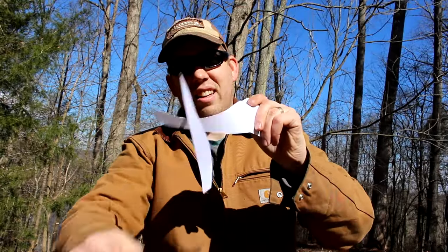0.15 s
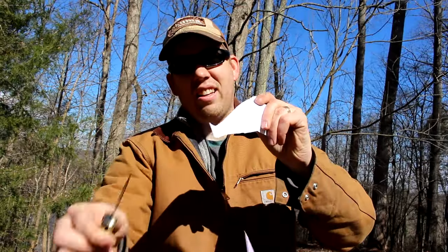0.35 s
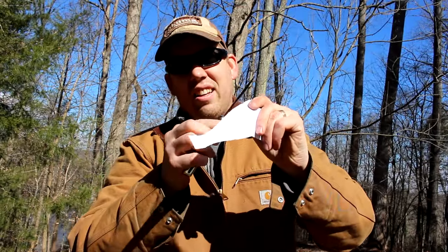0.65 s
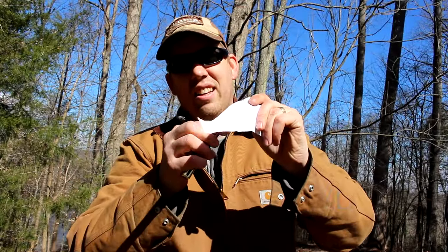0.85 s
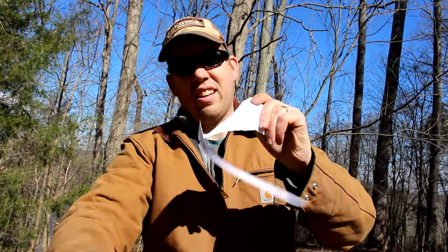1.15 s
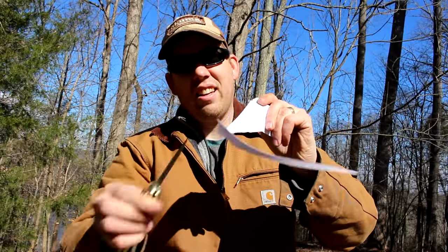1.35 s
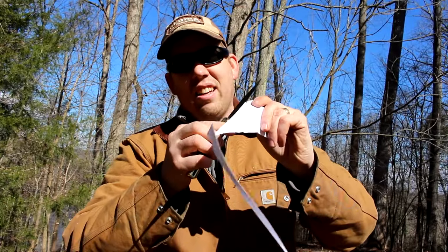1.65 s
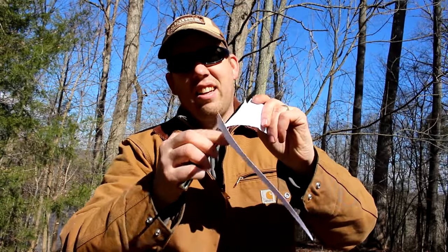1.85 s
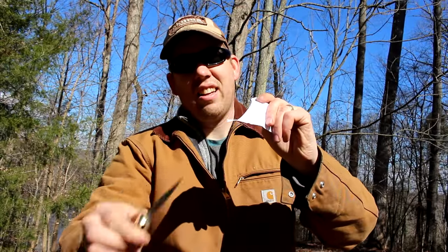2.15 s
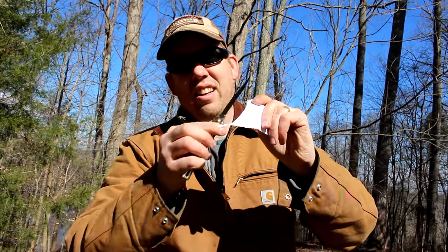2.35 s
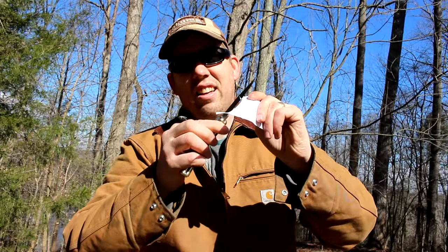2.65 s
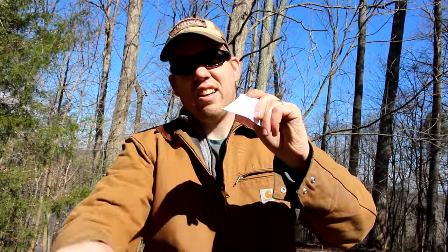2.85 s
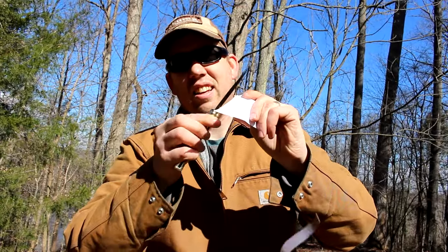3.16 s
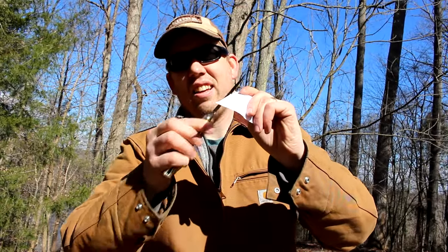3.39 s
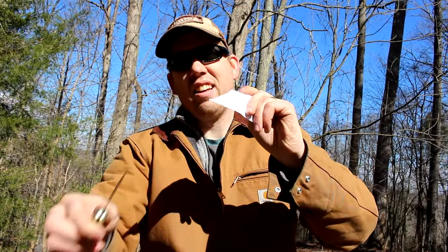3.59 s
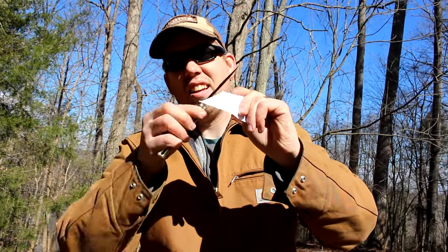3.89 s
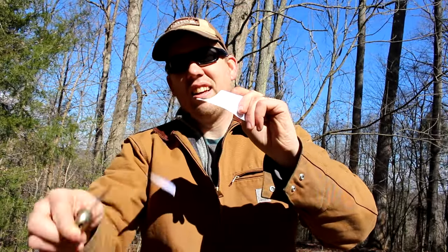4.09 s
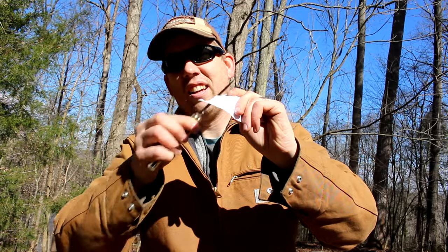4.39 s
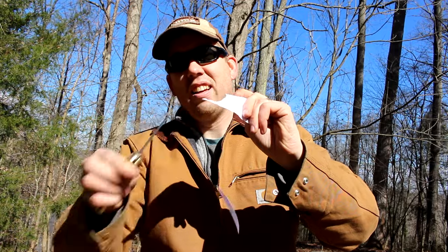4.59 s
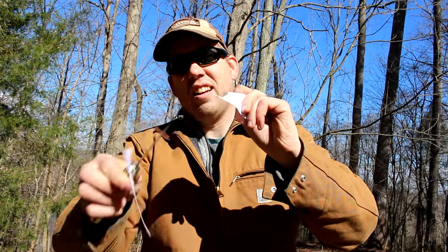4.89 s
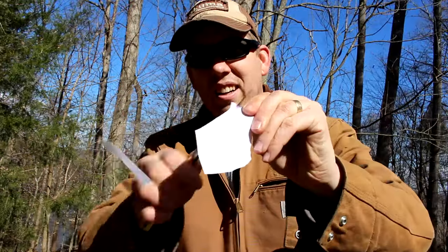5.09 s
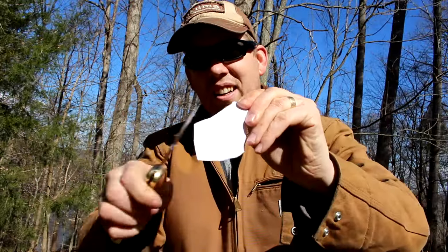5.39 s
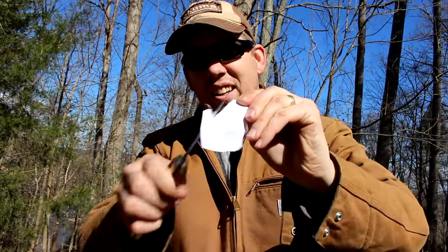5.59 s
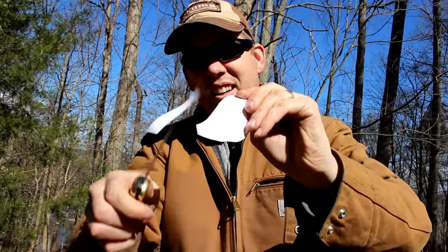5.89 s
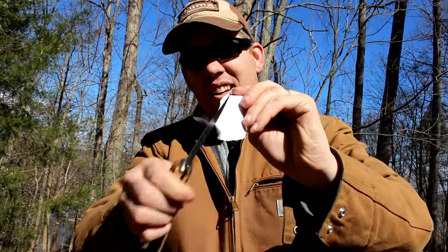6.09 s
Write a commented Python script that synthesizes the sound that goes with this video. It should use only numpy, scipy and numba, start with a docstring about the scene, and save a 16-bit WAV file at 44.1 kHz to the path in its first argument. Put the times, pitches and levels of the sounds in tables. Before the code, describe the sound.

Bright, dry rips of a blade through paper, drawn out at first, then shorter and snappier, close up outdoors with low wind rumble.

```python
"""First a knife slices through a hand-held sheet of paper over a low rumble of wind, in a wood.
More drawn slices follow, then quick chops that start with a snap, among small creases and light grazes.
Each cut is a dense impulse noise of breaking fibres that excites the resonances of the sheet.
Filtered noise gives a far murmur of trees and the wind; wavering sines give a small bird far off.
Automatic gain control lifts these quiet sounds and ducks them after loud cuts."""
import sys
import numpy as np
from scipy import signal
from scipy.fft import rfft, irfft
from scipy.io import wavfile
from scipy.ndimage import uniform_filter1d
from numba import njit

SR = 44100
rng = np.random.default_rng(int(sys.argv[2]) if len(sys.argv) > 2 else 0)


def volts(x):
    """Linear amplitude factor 10**(x/20) for a level x in dB, scalar or array-like."""
    e = np.asarray(x, float) / 20
    return 10 ** e


def pcm_store(signal):
    """Save signal as 16-bit PCM."""
    levels = np.round(np.clip(np.atleast_2d(signal), -1, 1) * 32767)
    wavfile.write(sys.argv[1], SR, levels.astype(np.int16).T)


N = 275184  # samples
T = np.arange(N) / SR
BLADE_T = T[::SR // 5000]  # coarser clock for the blade's motion
LEAVE_S = 0.012  # time for a cut to fall 30 dB once the blade leaves

# drawn slices, which swell in until the blade bites fully: [touch t/s, full bite t/s, exit t/s]
SLICES = [(-.04, .045, .188), (.962, 1.05, 1.164), (1.85, 1.92, 2.009), (2.696, 2.738, 2.822),
          (3.448, 3.466, 3.502), (4.02, 4.038, 4.075), (4.438, 4.472, 4.511), (4.808, 4.828, 4.872)]
# quick chops, which start at once: [bite t/s, exit t/s]
CHOPS = [(5.1577, 5.21), (5.4009, 5.424), (5.6394, 5.68), (5.8896, 5.925), (6.1361, 6.189)]


def unit(x):
    """Normalization: scale to rms 1."""
    return x / np.sqrt(np.mean(x ** 2))


@njit
def svf(x, hz, width):
    """Resonance: state-variable band-pass with a moving centre, gain 1 at the centre."""
    y, band_state, low_state = np.empty(len(x)), 0., 0.
    for i in range(len(x)):
        g, k = np.tan(np.pi * hz[i] / SR), width / hz[i]
        v = (band_state + g * (x[i] - low_state)) / (1 + g * (g + k))
        band_state = 2 * v - band_state
        low_state += 2 * g * v
        y[i] = k * v
    return y


@njit
def follow(x, attack, release):
    """Envelope detection: one-pole smoothing that rises fast and falls slowly."""
    y, level = np.empty(len(x)), abs(x[0])
    for i in range(len(x)):
        rate = attack if abs(x[i]) > level else release
        level += (abs(x[i]) - level) * rate
        y[i] = level
    return y


def band(x, hz, width_hz):
    """Fixed resonance: band-pass with a constant centre."""
    return svf(x, np.full(len(x), float(hz)), float(width_hz))


def steep(x, hz, width_hz):
    """Cascaded resonance: band-pass twice, for dark valleys on both sides."""
    return band(band(x, hz, width_hz), hz, width_hz)


def walk(rate):
    """Random modulation: levels held 1 / rate s and slewed twice; spread near 1."""
    k = int(SR / rate)
    held = np.repeat(rng.standard_normal(N // k + 1), k)
    return 1.4 * uniform_filter1d(uniform_filter1d(held, k), k)[:N]


def wood():
    """Spectral shaping: filtered noise makes the smooth far murmur of wind in the trees."""
    # spectrum of the murmur, its shape only: [f/Hz, density level/dB]
    spectrum = [(15, 6.5), (25, -70), (87, 3.5), (354, 0.5), (427, -2.5), (591, -5), (1130, -12),
                (1560, -15.5), (1740, -18), (2050, -15.5), (2220, -18.5), (3340, -16.5), (5280, -31.5),
                (14800, -48.5), (16000, -48)]
    f = np.fft.rfftfreq(N, 1 / SR) + 1  # 1 Hz up, so that the logarithm exists
    hz, db = np.transpose(spectrum)
    shape = volts(np.interp(np.log(f), np.log(hz), db))
    noise = irfft(rfft(rng.standard_normal(N)) * shape, N)
    return volts(-39.5 + .7 * walk(2.4)) * unit(noise)


def wind():
    """Turbulence: low-band noise with a wandering level, air buffeting the microphone port."""
    # strength of the wind, dying down: [t/s, level/dB]
    gust = [(0, -27), (.066, -29), (.11, -47), (.22, -40), (.3, -29), (.38, -34), (.45, -38.5),
            (.69, -33.5), (.83, -27.5), (1.0, -36), (1.06, -35), (1.15, -55), (1.3, -44), (1.9, -47),
            (2.3, -50.5), (3.5, -50), (4.5, -53.5), (6.24, -67)]
    s, db = np.transpose(gust)
    rumble = band(band(band(rng.standard_normal(N), 48, 116), 79, 155), 106, 185)
    return volts(np.interp(T, s, db) + 1.4 * walk(13.0)) * unit(rumble)


def bird():
    """Frequency modulation: two thin, slightly wavering sine notes."""
    # pitch glides of a small bird far off: [t/s, f/Hz, rms level/dB]
    whistle = [(2.345, 8100, -83), (2.375, 7791, -72), (2.389, 7816, -67), (2.449, 7815, -72),
               (2.5, 7849, -67)]
    chip = [(3.098, 4870, -60), (3.108, 5600, -45)]
    out = np.zeros(N)
    for note in (whistle, chip):
        s, hz, db = np.transpose(note)
        fade = np.clip(np.minimum(T - s[0], s[-1] - T) / 0.0044, 0, 1)
        pitch = np.interp(T, s, hz) * (1 + 0.0075 * walk(150))
        tone = np.sin(2 * np.pi * np.cumsum(pitch) / SR)
        out += np.sqrt(2) * fade * volts(np.interp(T, s, db)) * tone
    return out


def ticks():
    """Transient excitation: each crease is a short decaying noise burst in its own band."""
    # small creases, taps and last tears: [t/s, peak level/dB, centre f/Hz, width f/Hz, burst t60/s]
    creases = [(0.233, -25.5, 1880, 1920, 0.037), (.294, -44, 8000, 10000, 0.011),
               (0.371, -27, 1350, 1920, 0.044), (1.1635, -3.5, 7800, 2000, 0.011),
               (1.162, -32, 600, 1000, 0.0074), (1.1985, -33, 7400, 1800, 0.012),
               (1.246, -34, 1800, 1500, 0.022), (1.68, -43, 6000, 9200, 0.024),
               (1.741, -23.5, 2550, 6200, 0.024), (2.063, -44, 10800, 6000, 0.028),
               (2.826, -17, 700, 1200, 0.0093), (2.862, -20.5, 1480, 1800, 0.031),
               (2.878, -30, 2400, 1600, .02), (3.532, -24, 2030, 1600, 0.017),
               (3.638, -42, 6800, 4000, 0.0081), (3.502, -10, 2500, 3000, 0.0071),
               (4.076, -10.5, 2130, 3440, 0.014), (4.144, -42, 5970, 8000, .02),
               (4.19, -43, 7700, 6000, .01), (4.2, -48, 10000, 5000, .012), (4.211, -46, 9900, 5000, .012),
               (4.582, -41, 9000, 8000, 0.018), (4.624, -42, 8000, 9000, .015),
               (4.873, -1, 8900, 8900, 0.0073), (4.957, -31, 6960, 9000, 0.008),
               (5.424, -15, 2880, 2500, .01), (5.776, -46, 9000, 12000, .03),
               (5.811, -30, 8850, 12000, 0.0075), (5.833, -41, 10200, 12000, .012),
               (5.861, -44, 8300, 8900, 0.011), (5.947, -30, 1500, 700, .05), (5.99, -44, 8050, 8000, .012)]
    out, t = np.zeros(N), T[:SR // 20]
    for s, db, hz, width_hz, t60 in creases:
        fade = np.exp(-np.log(1000) * t / t60)
        rise = np.minimum(t / (0.15 * t60), 1)
        burst = rng.standard_normal(len(t)) * fade * rise
        sound = band(steep(burst, hz, width_hz), hz, 2 * width_hz)
        i = int(s * SR)
        out[i:i + len(t)] += volts(db) * sound / np.abs(sound).max()
    return out


def snaps():
    """Impact response: a sharp push rings two heavily damped sheet modes over a low thump."""
    # the blade chops into the edge: [t/s, peak level/dB, main f/Hz, second f/Hz, ring t60/s]
    edge_hits = [(5.1578, -4, 1650, 4240, 0.012), (5.401, -7.5, 2330, 2960, 0.011),
                 (5.64, -6.5, 2200, 2910, 0.029), (5.8898, -3.5, 1850, 1170, 0.011),
                 (6.1364, -1.5, 1960, 1180, 0.016)]
    out, t = np.zeros(N), T[:SR // 20]
    for s, db, main_hz, second_hz, t60 in edge_hits:
        fade = np.exp(-np.log(1000) * t / t60)
        ring = np.sin(2 * np.pi * main_hz * t) + 0.5 * np.sin(2 * np.pi * second_hz * t)
        thump = 0.095 * np.sin(2 * np.pi * 600 * t) * np.exp(-t / 0.0007)
        sound = ring * fade + thump
        i = int(s * SR)
        out[i:i + len(t)] += volts(db) * sound / np.abs(sound).max()
    return out


def fibres():
    """Random impulses: fibres break at chance moments, a few much harder, in clusters as the blade slips."""
    breaks_per_s, spread_db, cluster_db = 20000, 1.6, 1.37
    breaks = rng.random(N) < breaks_per_s / SR
    size = volts(spread_db * rng.exponential(size=N) + cluster_db * walk(500))
    return breaks * size * rng.standard_normal(N)


def contact(touch, start, end, start_db, end_db, fall_s):
    """Contact envelope: power-law rise and fall; level in dB, and dB lost before and after the hold."""
    swell_curve, leave_curve = 1.4, 1.3  # exponents
    risen = np.clip((BLADE_T - touch) / max(start - touch, 1e-5), 1e-9, 1)
    before = -20 * swell_curve * np.log10(risen)
    since_exit = np.maximum(BLADE_T - end, 0)
    after = np.minimum(30 * (since_exit / fall_s) ** leave_curve, 200)
    held = np.interp(BLADE_T, (start, max(end, start + 1e-4)), (start_db, end_db))
    return held - before - after, before, after


def blade():
    """Power summation: gains of ring, hiss and flex add in power over slices, chops and grazes."""
    # basic strength of each stroke, slices then chops, ahead of the tear, chop, arch and softness terms:
    # [ring level at bite/dB, ring level at exit/dB, hiss level re ring/dB, sheet flex level re ring/dB]
    strengths = [(-18.5, -22, 0, -11.5), (-20.5, -21.5, 0.2, -10.5), (-21, -19.5, -0.5, -13.5),
                 (-21, -21, -1, -12.5), (-19, -20, -2.5, -11.5), (-24.5, -21.5, 1, -12.5),
                 (-23.5, -24.5, 1.7, -9), (-20.5, -21.5, -1.1, -3), (-16.5, -24.5, -2.5, -6.5),
                 (-24, -20, 0, -4.5), (-22.5, -20.5, -0.5, -4.5), (-24, -26, 2.2, 2),
                 (-22.5, -24.5, -0.5, 1.2)]
    # light contact of blade and edge before or after a stroke:
    # [start t/s, end t/s, start level/dB, end level/dB, hiss level re ring/dB]
    grazes = [(0.201, 0.203, -32, -37, -12), (0.898, 0.975, -36, -38.5, -5), (1.171, 1.182, -22, -32, -3.5),
              (1.195, 1.214, -40, -30.5, -28), (1.805, 1.885, -44, -34.5, -6.5),
              (2.573, 2.572, -50, -47, -1.5), (2.586, 2.639, -53, -39.5, -4.5),
              (2.667, 2.693, -38.5, -52, -5.5), (3.404, 3.462, -56, -43, 1), (3.512, 3.52, -36, -34, 2),
              (4.52, 4.522, -29, -25, -5), (4.539, 4.539, -35, -19.5, -3), (4.877, 4.891, -37, -48, -8),
              (4.906, 4.906, -39, -36, -2), (4.94, 4.944, -42, -43.5, -3), (5.442, 5.454, -23.5, -20.5, -1),
              (5.46, 5.471, -42, -46, -2), (5.69, 5.703, -44, -50, 4), (5.935, 5.933, -31, -28, 9),
              (5.942, 5.945, -45, -45, -9), (6.2, 6.209, -27, -29, -11)]
    tear_db, tear_flex_db, tear_s = 3, 8, 0.0035  # the last fibres tear free and shake the sheet
    chop_extra_db, chop_settle_s = 9, 0.0055  # a chop bites harder at first
    graze_in_s, graze_out_s = .003, .007  # time to rise; time to fall 30 dB
    hiss_arch_db = 1  # hiss is favoured mid-slice
    hiss_swell, hiss_leave = 0.079, 0.35  # dB of hiss lost for each dB below full bite
    flex_soft = 0.53  # dB of flex won for each dB below full bite
    layers = []
    for (touch, start, end), (start_db, end_db, hiss_db, flex_db) in zip(SLICES, strengths):
        held, before, after = contact(touch, start, end, start_db, end_db, LEAVE_S)
        tear = np.exp(np.minimum(BLADE_T - end, 0) / tear_s)
        arch = np.sin(np.pi * np.clip((BLADE_T - start) / (end - start), 0, 1))
        ring = held + tear_db * tear
        hiss = ring + hiss_db + hiss_arch_db * arch - hiss_swell * before - hiss_leave * after
        flex = ring + flex_db + tear_flex_db * tear + flex_soft * np.minimum(before + after, 30)
        layers.append((ring, hiss, flex))
    for (start, end), (start_db, end_db, hiss_db, flex_db) in zip(CHOPS, strengths[len(SLICES):]):
        held, _, after = contact(start, start, end, start_db, end_db, LEAVE_S)
        extra = chop_extra_db * np.exp(-np.abs(BLADE_T - start) / chop_settle_s)
        ring = held + extra
        hiss = held + extra / 2 + hiss_db - hiss_leave * after
        flex = ring + flex_db + flex_soft * after
        layers.append((ring, hiss, flex))
    for start, end, start_db, end_db, hiss_db in grazes:
        ring, _, after = contact(start - graze_in_s, start, end, start_db, end_db, graze_out_s)
        layers.append((ring, ring + hiss_db - hiss_leave * after, ring + flex_soft * after))
    power = sum(volts(2 * np.array(layer)) for layer in layers)
    return [np.interp(T, BLADE_T, np.sqrt(p)) for p in power]


def cutting():
    """Forced resonance: the fibre spray rings the sheet near the blade, flexes it all and hisses."""
    # paper under each stroke, slices then chops; long strips ring their own modes, small scraps blur;
    # pitches before their random wobble, strip share before the blur:
    # [ring f at bite/Hz, ring f at exit/Hz, hiss f at bite/Hz, hiss f at exit/Hz, strip share/1]
    pieces = [(3080, 3020, 2700, 5600, 0.02), (2900, 3200, 8400, 11500, 0.06),
              (3060, 3100, 9600, 11700, 0.24), (3220, 3130, 11500, 3600, 0.43), (3210, 3100, 8950, 4600, 0),
              (3020, 3700, 10400, 4000, 0.07), (3150, 3100, 12000, 4300, 0), (3150, 3140, 11400, 7700, 0),
              (3330, 2640, 7500, 9100, 0), (2830, 2780, 11000, 8500, 0), (2900, 3000, 12100, 7700, 0),
              (3000, 2700, 11500, 8200, 0), (2930, 2750, 10500, 5300, 0)]
    # modes of the free strip, the lowest first: [f/Hz, width f/Hz, level/dB]
    strip_modes = [(1450, 250, 0), (2600, 330, -1), (3620, 330, 0), (4300, 350, -8)]
    ring_gain, hiss_gain, flex_gain = blade()
    s, paper = np.ravel([row[-2:] for row in SLICES + CHOPS]), np.array(pieces)
    ring_hz = np.interp(T, s, paper[:, :2].ravel())
    hiss_hz = np.interp(T, s, paper[:, 2:4].ravel())
    # share of the slice already cut
    done = sum(np.interp(T, (start, end, end + LEAVE_S), (0, 1, 0)) for _, start, end in SLICES)
    # as the uncut length shrinks the strip's modes blur and an upper ring climbs and grows
    strip = np.interp(T, s, np.repeat(paper[:, 4], 2)) * (1 - .7 * done)
    upper_hz = 4600 + 700 * done
    upper_gain = volts(-20 + 11 * done)

    spray = fibres()
    ring_hz = np.clip(ring_hz * (1 + .05 * walk(150)), 500, 8000)
    main_ring = svf(svf(spray, ring_hz, 780.0), ring_hz, 3400.0)
    upper_ring = svf(svf(spray, upper_hz, 1800.0), upper_hz, 1800.0)
    lower_ring = steep(spray, 2286, 1370)
    ring = unit(main_ring - upper_gain * upper_ring + volts(-7) * lower_ring)
    flex = unit(steep(spray, 1650, 1440) + volts(-4.0) * band(spray, 980, 610))

    low, *high = (volts(db) * steep(spray, hz, width_hz) for hz, width_hz, db in strip_modes)
    # a loud cut damps the strip's modes
    ring_db = 20 * np.log10(ring_gain + 1e-9)
    modal = strip * np.clip((-6 - ring_db) / 26, .3, 1)
    ring = np.sqrt(1 - modal) * ring + np.sqrt(modal) * unit(sum(high))
    strip_flex = unit(low + volts(-12) * band(spray, 750, 370))
    flex = np.sqrt(1 - modal) * flex + np.sqrt(modal) * strip_flex

    # the treble comes from its own, partly separate breaks
    high_pass = signal.butter(N=3, Wn=4200, btype="high", fs=SR, output="sos")
    crisp = signal.sosfilt(high_pass, .6 * spray + .8 * fibres())
    hiss_hz = np.clip(hiss_hz * (1 + .06 * walk(40)), 3000, 16000)
    hiss = unit(svf(svf(crisp, hiss_hz, 14500.0), hiss_hz, 16500.0) + 0.22 * crisp)
    return ring_gain * ring + hiss_gain * hiss + flex_gain * flex


def scene():
    """Superposition: wood, wind and bird around, paper close by."""
    return (wood() + wind() + bird() + ticks() + snaps() + cutting())[None]


def band_limit(x):
    """A steep low-pass at the top of the band."""
    return signal.sosfilt(signal.butter(12, 16500, fs=SR, output="sos"), x)


def record(dry):
    """Dynamic compression: gain lifts the quiet and drops on peaks; hiss joins, peaks clip, the top is cut."""
    lift_db, hiss_db, top_hz = 7.5, -56.5, 15900
    quick = follow(dry[0], 1 / (0.0025 * SR), 1 / (.1 * SR))  # attack and release times in s
    slow = follow(quick, 1 / (0.085 * SR), 1 / (.6 * SR))
    gain = volts(lift_db) / (1 + quick / 0.19) ** 0.6 / (1 + slow / 0.39) ** 0.42
    preamp = dry * gain + volts(hiss_db) * rng.standard_normal(N)
    clipped = np.clip(preamp, -.95, .95)
    low_pass = signal.ellip(8, .2, 70, top_hz, fs=SR, output="sos")
    mix = signal.sosfilt(low_pass, clipped)
    return band_limit(mix)


dry = scene()
out = record(dry)
pcm_store(out)
```